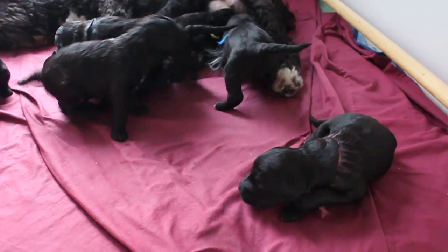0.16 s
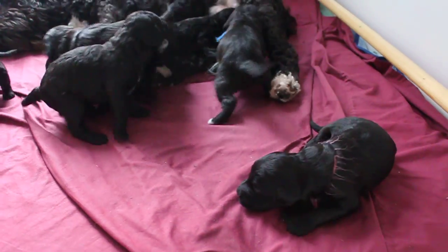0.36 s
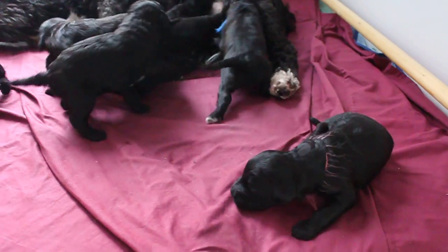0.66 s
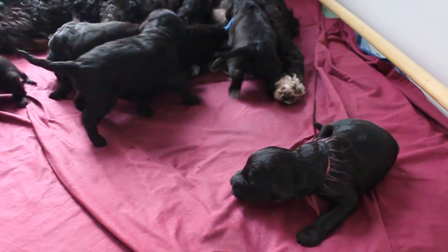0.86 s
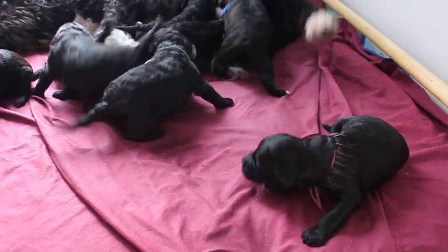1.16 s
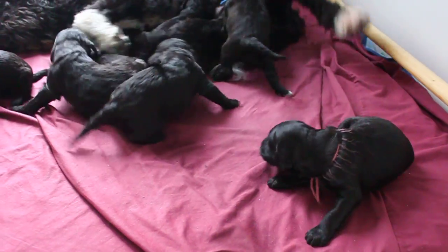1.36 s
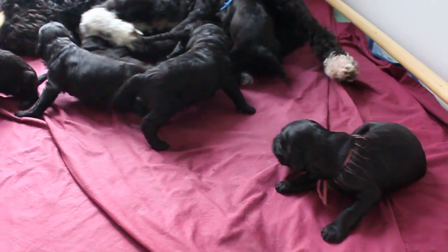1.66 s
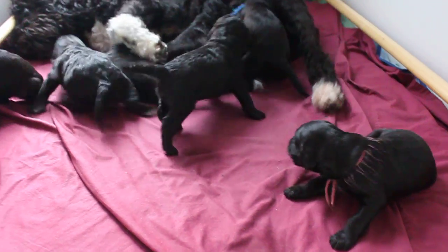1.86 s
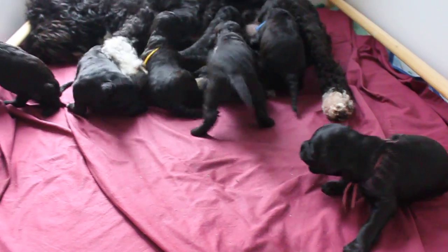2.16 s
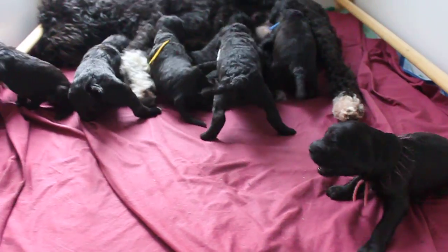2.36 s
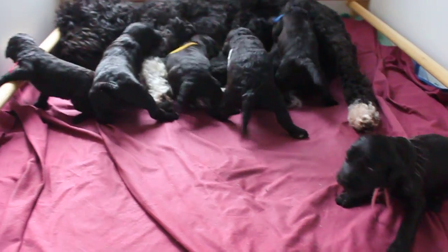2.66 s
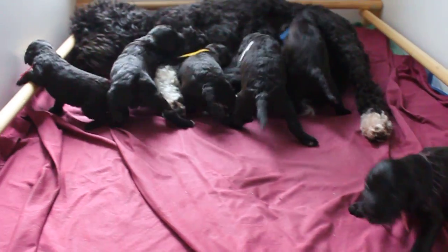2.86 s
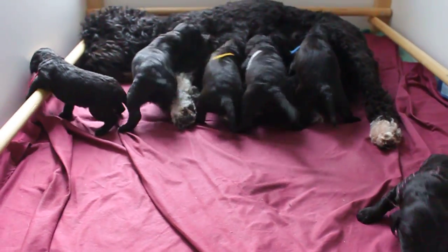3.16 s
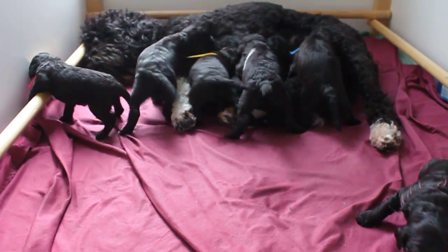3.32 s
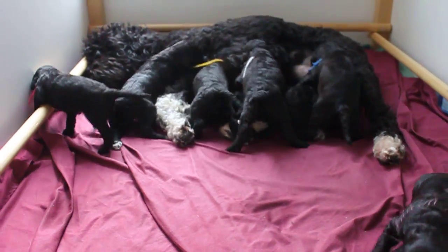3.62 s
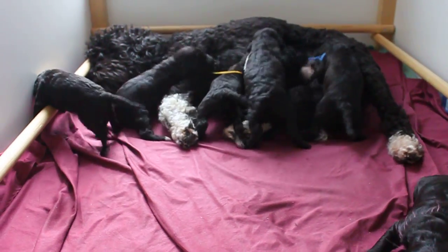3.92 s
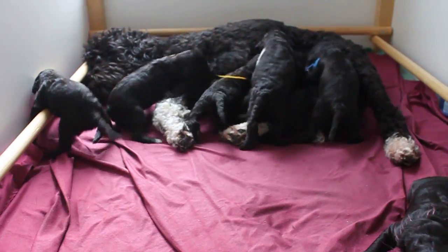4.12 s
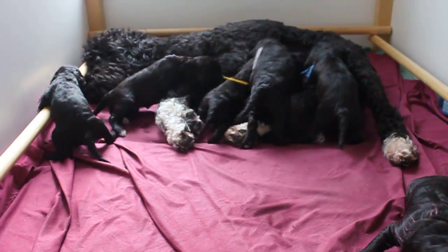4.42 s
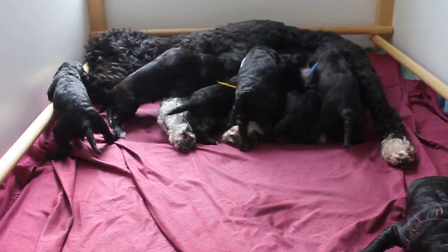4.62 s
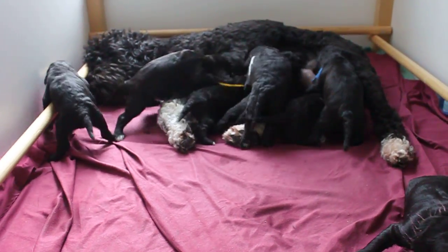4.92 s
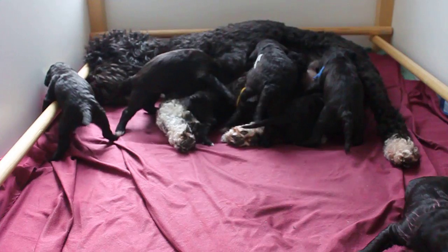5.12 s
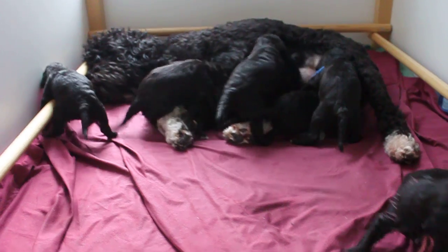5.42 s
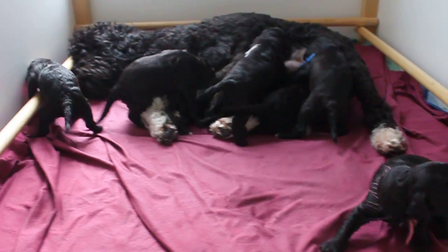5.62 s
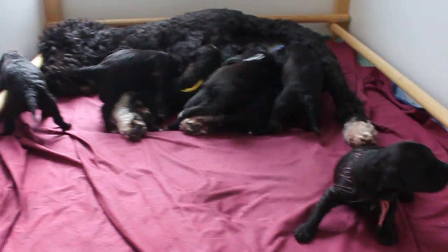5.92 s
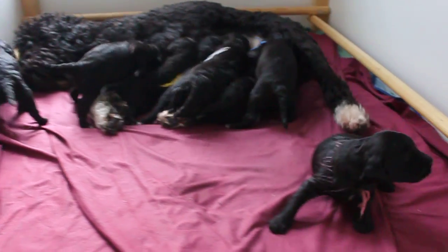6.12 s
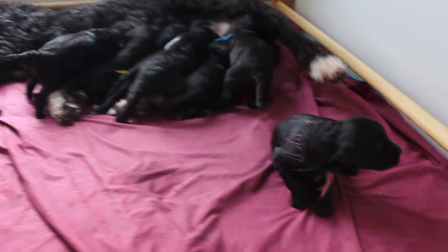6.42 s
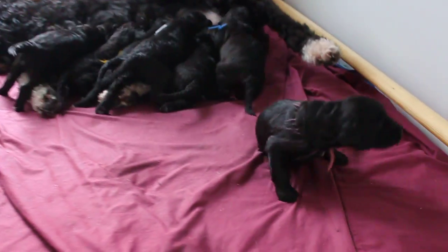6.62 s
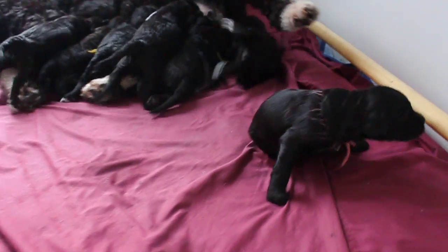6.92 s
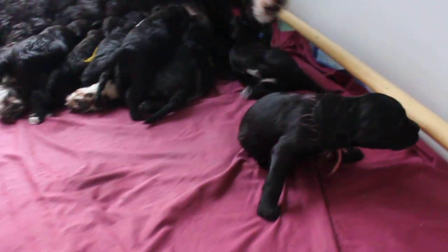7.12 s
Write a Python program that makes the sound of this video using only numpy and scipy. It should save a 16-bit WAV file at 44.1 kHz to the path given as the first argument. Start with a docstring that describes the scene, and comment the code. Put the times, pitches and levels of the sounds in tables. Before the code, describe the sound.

Young puppies are heard from close by, indoors, in a box whose walls add a short ring. Soft rustling and dragging on a cloth sheet runs throughout, with occasional dull paw thuds and small mouth clicks. Muffled whimpers and snuffles come first. From about 0.7 seconds, a near pup gives short, thin whines that climb in pitch, with faint, very high nose whistles. Three loud, clear squeals, each rising and falling, follow at about 1.9, 2.3 and 2.8 seconds. Between 3 and 4.9 seconds the crying pauses, leaving shuffling, clicks, light puffs of air and a few small raspy grunts. Two more loud squeals come at about 5 and 5.5 seconds, then weaker whines around 6 and 6.4 seconds and a muffled whimper and grunt near 6.7. It ends with a longer drag over the cloth and a sharper click at about 7.1 seconds.

```python
"""Puppies nursing in a whelping box

Indoors, one microphone close to the litter. The nearest pups squeal in arched, nearly pure cries from
their vocal folds and whistle through their noses; farther off, others whimper, grunt and snuffle.
Paws thud and drag on the sheet, mouths click at the teats, and the box walls give a short ring.
The recorder's gain control ducks under the loudest cries and slowly climbs back."""
import sys
import numpy as np
from scipy import signal
from scipy.fft import rfft, irfft, next_fast_len
from scipy.io import wavfile
from scipy.ndimage import uniform_filter1d, map_coordinates

SR = 44100
rng = np.random.default_rng(int(sys.argv[2]) if len(sys.argv) > 2 else 0)


def put_to_file(sound):
    """Save the sound as 16-bit audio at rate SR, in the file named by the first command-line argument."""
    columns = np.atleast_2d(sound).T  # one column per channel
    safe = np.clip(columns, -1, 1)
    whole_steps = np.round(safe * 32767)
    wavfile.write(sys.argv[1], SR, whole_steps.astype(np.int16))


N = 321048

# ring of the box walls: f/Hz, t60/s
BOX_DECAY = [(200, 0.088), (1700, 0.222), (5000, 0.1914), (12000, 0.0824)]
# the restless litter on the sheet: t/s, shuffle/dB, rustle/dB
BUSTLE = [(0, -53.5, -30), (0.139, -49.5, -49), (.28, -47, -39.5), (.67, -52, -48), (1.1, -46.5, -45),
          (1.76, -55.5, -46), (2.001, -52, -47.5), (2.45, -60.5, -52.5), (2.75, -51, -53),
          (3.1, -47.5, -38.5), (3.5, -45, -42), (4.0, -55, -50), (4.9, -53, -47), (5.15, -52.5, -47.5),
          (5.6, -54.5, -43), (6.0, -61.5, -44), (6.249, -53.5, -44), (6.6, -49, -39), (7.28, -47.5, -47.5)]
# drags of a paw or belly, the first row instead a bright burst that goes with a pup's yelp: middle t/s,
# length/s, shuffle/dB, rustle/dB, fibre hiss/dB
DRAGS = [(0.871, 0.082, -59, -38, -33.5), (0.938, 0.19, -60.5, -39, -42.5),
         (1.039, 0.089, -36.5, -36.5, -44.5), (1.17, 0.066, -62, -62, -43.5),
         (1.37, 0.13, -69.5, -41.5, -40), (1.452, 0.063, -54.5, -42.5, -40.5),
         (2.6, 0.1215, -41, -38.5, -58.5), (2.698, 0.037, -66, -59.5, -40), (3.004, 0.086, -51, -36, -59.5),
         (3.419, 0.1585, -61.5, -34.5, -37), (3.741, 0.12, -44, -40, -43), (4.191, 0.041, -47, -45.5, -51),
         (4.522, 0.192, -54, -41.5, -52), (5.803, 0.075, -44.5, -37, -34.5),
         (6.481, 0.09, -59, -53.5, -34.5), (6.914, 0.34, -46, -35.5, -34)]
# spectra of the low shuffle and of the rubbed cloth: f/Hz, gain/dB
SHUFFLE_COLOUR = [(35, -42), (60, -35), (80, -2), (118, -14), (151, 0), (231, -6), (400, -9), (520, -13.5),
                  (880, -120)]
CLOTH_COLOUR = [(150, -41), (250, -4), (616, 4), (1060, 2.5), (1470, 2.5), (1870, 1), (4080, -8),
                (13800, -19.5), (15800, -20.5)]
# paws landing: t/s, level/dB, f/Hz
THUDS = [(0.159, -35.5, 285), (0.263, -29, 164.8), (0.379, -31.5, 369.2), (1.039, -27, 131.3),
         (1.298, -36.5, 169.4), (1.693, -26, 157.8), (2.57, -28.5, 244), (3.713, -26, 208.2),
         (7.077, -30.5, 103.2)]
# lips and claws: t/s, relative level/dB
CLICKS = [(0.3792, -25), (0.4113, -26.5), (.615, -38), (1.036, -24), (1.0842, -32.5), (1.4458, -26),
          (1.696, -26), (2.574, -26), (2.588, -22), (2.611, -20), (2.64, -25), (2.6576, -25), (3.5, -27),
          (3.569, -19), (3.591, -23), (3.965, -25), (4.314, -27), (4.8412, -33), (5.295, -24.5),
          (5.328, -29.5), (5.341, -25), (6.4745, -25), (6.4874, -24), (7.0775, -12.5)]
# modes of a click: f/Hz, width/Hz, gain/dB
CLICK_MODES = [(1896, 900, 0.5), (4020, 2100, 0.5), (7500, 5300, -2.5), (11900, 10000, -3.5)]
# puffs through nose and mouth: t/s, length/s, mouth f/Hz, low level/dB, treble level/dB
SNUFFLES = [(0, 0.035, 1050, -28.5, -49), (.158, 0.086, 1100, -38, -48.5), (1.836, .025, 2200, -27, -46),
            (3.146, .04, 2200, -43.5, -55), (3.248, 0.082, 1280, -34.5, -54), (4.95, 0.19, 2500, -37, -45),
            (5.41, 0.079, 2280, -29, -37), (6.655, .12, 1050, -32, -40)]
# hoarse whimpers and raspy grunts of the farther pups:
# t/s, swell/s, fade/s, first f/Hz, last f/Hz, fundamental/dB, overtones before colour/dB, mouth f/Hz
WHIMPERS = [(.025, 0.025, 0.048, 473.5, 461.3, -37.5, -35.5, 1877),
            (.23, 0.036, 0.016, 526.3, 604.6, -33.5, -25.5, 1756),
            (.465, 0.0062, 0.061, 1150, 1218, -29, -36, 2275),
            (.488, 0.037, .045, 560.1, 721.4, -38.5, -29, 1740),
            (1.02, 0.018, 0.015, 852.5, 866.7, -25.5, -34.5, 1720),
            (1.345, 0.039, .025, 1132, 1462, -25.5, -34, 2530),
            (1.778, 0.0444, .042, 359.7, 390, -35, -35.5, 1100),
            (2.256, 0.0095, 0.022, 1843, 1727, -15, -31.5, 3490),
            (4.938, 0.0085, 0.016, 1693, 1684, -28.5, -54.5, 3390),
            (5.407, 0.011, 0.021, 1814, 1807, -12, -45, 3500),
            (6.15, 0.1015, 0.0783, 259.7, 288.1, -48.5, -46, 585),
            (6.555, 0.045, .035, 717.7, 854.4, -41.5, -63, 1600),
            (6.636, 0.045, .06, 1187, 1115, -26.5, -28, 2380)]
GRUNTS = [(.852, 0.0127, 0.0292, 716.4, 805.1, -33, -25, 1587),
          (1.263, 0.00194, 0.0223, 756.5, 731, -32.5, -39, 1459),
          (1.668, 0.0286, 0.0203, 1159, 823, -34, -45.5, 1864),
          (3.165, 0.0224, 0.0272, 504.1, 573, -32, -24.5, 1654),
          (3.4, .032, .045, 1219, 874, -25, -29, 2010), (4.732, .006, .04, 890, 830, -39, -40, 1740),
          (6.708, 0.0186, 0.0383, 497.2, 448.6, -35.5, -24.5, 994)]
# overtone colour of a mouth half shut on a teat, and of a squealing throat: f/Hz, gain/dB
MUFFLED_COLOUR = [(600, 8), (1100, -6.5), (1700, -1), (2400, -16), (3400, -28), (5300, -19.5), (8000, -24),
                  (15000, -35)]
THROAT_COLOUR = [(1600, 14.5), (2500, -0.5), (3600, -11), (4300, -17), (5300, -0.5), (7000, -12),
                 (9500, -17), (12000, -33), (15000, -35)]
MUFFLED_HZ, THROAT_HZ = 1700, 5147  # mouth resonance of each colour
# air through a nose: t/s, length/s, f/Hz, level/dB
WHISTLES = [(1.394, 0.049, 15450, -39), (1.642, 0.039, 14900, -37.5), (5.953, 0.145, 13700, -42.5),
            (5.976, 0.17, 15400, -49), (6.14, 0.027, 14900, -33.5)]
# cries nearest the microphone, a list each: t/s, f/Hz, fundamental/dB, overtones before colour/dB
SQUEALS = [
    [(0.735, 1177, -32, -52), (0.76, 1181, -26.5, -39.5), (0.8, 1300, -25, -36.5),
     (0.83, 1267, -24.5, -42.5), (0.86, 1296, -48, -49.5)],
    [(.824, 903, -23, -39), (.86, 1019, -18, -42.5), (.885, 1134, -22.5, -47), (.93, 1010, -33, -63)],
    [(0.99, 1193, -33, -50.5), (1.04, 1266, -36, -42), (1.09, 1420, -20.5, -41), (1.125, 1407, -27.5, -49),
     (1.17, 1255, -44, -48.5)],
    [(1.32, 1489, -26, -53.5), (1.34, 1742, -23.5, -54.5), (1.365, 1630, -55.5, -66.5)],
    [(1.472, 1548, -18, -52), (1.495, 1738, -19.5, -38.5), (1.55, 1842, -12, -46), (1.57, 1992, -22, -52.5),
     (1.62, 1853, -19.5, -39.5), (1.645, 1582, -29.5, -55), (1.665, 1416, -40, -53)],
    [(1.595, 1345, -35, -54), (1.65, 1395, -28, -48), (1.7, 1420, -48, -50)],
    [(1.835, 1781, -13.5, -55), (1.87, 1826, -4, -25.5), (1.878, 1736, -5.5, -21), (1.89, 1739, 0, -18),
     (1.915, 1806, 5.5, -23), (1.932, 1874, -3.5, -15), (1.942, 2060, 3, -29.5), (1.99, 2082, -7.5, -34.5),
     (2.03, 2098, -11, -47.5), (2.055, 1698, -23, -43.5), (2.085, 1492, -35.5, -76)],
    [(2.262, 1623, -28, -30), (2.285, 1646, -8, -15.5), (2.32, 1765, -1.5, -10), (2.36, 1848, -1.5, -28.5),
     (2.39, 1878, -9, -35), (2.46, 1651, -23.5, -40.5), (2.51, 1459, -23, -35), (2.538, 916, -40.5, -41.5)],
    [(2.717, 1373, -24, -27.5), (2.75, 1495, -7.5, -11.5), (2.78, 1665, 3.5, -7), (2.814, 1751, -5, -18),
     (2.822, 2048, -7.5, -28), (2.832, 1762, -2.5, -31.5), (2.85, 1770, -6.5, -24),
     (2.88, 1391, -16.5, -29), (2.93, 1150, -34.5, -31.5), (2.96, 990, -27.5, -51.5)],
    [(4.945, 1279, -39, -51), (4.96, 1383, -23.5, -34.5), (4.995, 1636, -20.5, -29.5),
     (5.015, 1711, -1.5, -20.5), (5.04, 1726, 8, -22.5), (5.048, 1822, -4.5, -26.5),
     (5.056, 2007, 1.5, -32.5), (5.09, 1803, -14.5, -46.5), (5.17, 1924, -16.5, -51),
     (5.22, 1662, -28, -48), (5.26, 1551, -34, -63.5)],
    [(5.42, 1530, -20, -28), (5.435, 1544, -26, -15), (5.462, 1729, 2.5, -7.5), (5.51, 1735, 0, -20),
     (5.525, 1806, -10, -36), (5.6, 1829, -21, -26), (5.67, 1708, -6, -41.5), (5.695, 1412, -20, -31),
     (5.725, 1111, -50, -35)],
    [(5.898, 1253, -35, -48.5), (5.94, 1392, -17.5, -35), (5.975, 1552, -16.5, -38.5),
     (6.02, 1557, -14.5, -39.5), (6.07, 1344, -26.5, -29), (6.12, 1287, -22, -29), (6.135, 1106, -24, -31),
     (6.17, 1110, -47, -50)],
    [(6.338, 1156, -27.5, -48), (6.38, 1254, -24.5, -47), (6.42, 1236, -16.5, -37.5),
     (6.45, 1042, -19, -44), (6.49, 1138, -57.5, -58)],
]
# each squeal's mouth as the jaw moves: first f/Hz, last f/Hz, tilt/dB per partial, jitter/share of pitch
SQUEAL_MOUTHS = [(5200, 5170, -0.73, 0.0049), (5260, 7500, 1.3, .008), (5520, 4955, -1.4, 0.0042),
                 (3997, 6700, 0, 0.0029), (5567, 5100, 1.3, 0.0061), (5400, 5650, 2.5, .006),
                 (5480, 4750, 0.1, 0.0047), (5070, 5286, -0.82, 0.0016), (4125, 5050, 0, 0.0034),
                 (5110, 5750, 0.38, 0.0047), (5550, 2687, -1.1, .003), (6340, 3540, -1.8, 0.0037),
                 (5990, 5760, 1.69, 0.0038)]
# a second, slower flap of the folds in one cry: t/s, length/s, f/Hz, level against the cry/dB
FOLD_FLAP = (5.478, .1, 563, -22)


def amp(db):
    """dB to gain."""
    return 10 ** (np.asarray(db) / 20)


def unit(x):
    """Scaled to rms 1."""
    return x / np.sqrt(np.mean(x ** 2) + 1e-20)


def along(points, hz):
    """Interpolate (f/Hz, value) points on a log frequency axis."""
    f, values = np.transpose(points)
    return np.interp(np.log(hz + 1), np.log(f + 1), values)


def wobble(rate, size=N):
    """A smooth random curve, rate knots a second."""
    knots = rng.standard_normal(int(size * rate / SR) + 4)
    return map_coordinates(knots, [np.arange(size) * rate / SR])


def filtered(x, response):
    """Shape x by a frequency response."""
    size = next_fast_len(N + 8192)
    return irfft(rfft(x, size) * response(np.fft.rfftfreq(size, 1 / SR)), size)[..., :N]


def resonance(f, hz, width_hz):
    """Response of one damped mode; squared, it is steeper."""
    return 1j * f * width_hz / (hz * hz - f * f + 1j * f * width_hz)


def patchy_noise(depth_db):
    """White noise with patches of random gain in time and frequency."""
    spectrum = signal.stft(rng.standard_normal(N + 512), nperseg=256)[2]
    patches = uniform_filter1d(rng.standard_normal(spectrum.shape), 5, axis=0)
    patches = uniform_filter1d(patches, 8, axis=1)
    return signal.istft(spectrum * amp(depth_db * unit(patches)), nperseg=256)[1][:N]


def box_walls(x):
    """Close walls return a dense tail in which each frequency dies at its own speed."""
    hz, t, spectrum = signal.stft(rng.standard_normal(SR // 2), SR, nperseg=256)
    decay = amp(-60 * t / along(BOX_DECAY, hz)[:, None])
    tail = signal.istft(spectrum * decay, SR, nperseg=256)[1]
    return signal.fftconvolve(np.pad(x, (200, 0)), tail / np.linalg.norm(tail))[:N]


def crawling():
    """Bodies rub the sheet: low shuffle, grainy rustle, fibre hiss; single drags swell above the rest."""
    t = np.arange(N) / SR
    times, *columns = np.transpose(BUSTLE)
    shuffle_db, rustle_db = [np.interp(t, times, column) for column in columns]
    hiss_db = -47 + 0.13 * (rustle_db - rustle_db.mean())
    levels = amp([shuffle_db, rustle_db, hiss_db])
    for middle, length, *drag_db in DRAGS:
        at = slice(round((middle - length / 2) * SR), round((middle + length / 2) * SR))
        swell = 1 - (2 * (t[at] - middle) / length) ** 2
        levels[:, at] = np.hypot(levels[:, at], amp(drag_db)[:, None] * swell)
    lumps = amp(3.6 * wobble(25))
    shuffle = lumps * filtered(rng.standard_normal(N), lambda f: amp(along(SHUFFLE_COLOUR, f)))
    fibres = patchy_noise(depth_db=2.5) * amp(0.97 * wobble(30) + 1.305 * wobble(400))
    cloth = filtered(fibres, lambda f: amp(along(CLOTH_COLOUR, f)))
    rustle = filtered(cloth, lambda f: 1 / (1 + (f / 4500) ** 4))
    hiss = amp(2.2 * wobble(20)) * (cloth - rustle)  # in short strokes
    return np.sum(levels * [unit(shuffle), unit(rustle), unit(hiss)], axis=0)


def paw_thuds(rise_s=0.00602, t60_s=0.0399):
    """A landing paw sets the padded floor into a low, damped swing."""
    out, t = np.zeros(N + SR), np.arange(SR // 5) / SR
    for start, db, hz in THUDS:
        envelope = amp(db + 11.5 - 60 * t / t60_s) * (1 - np.exp(-t / rise_s))
        out[round(start * SR):][:len(t)] += envelope * np.sin(2 * np.pi * hz * t)
    return out[:N]


def clicks():
    """Lips and claws snap: a sharp pulse and a burst of noise excite broad, bright modes."""
    out, t = np.zeros(N + SR), np.arange(SR // 5) / SR
    pulse = 2 * np.exp(-t / .0001)
    for start, db in CLICKS:
        burst = .5 * amp(-60 * t / .008) * rng.standard_normal(len(t))
        out[round(start * SR):][:len(t)] += amp(db + 5) * (pulse + burst)
    return filtered(out[:N], lambda f: sum((-1) ** k * amp(db) * resonance(f, hz, width)
                                           for k, (hz, width, db) in enumerate(CLICK_MODES)))


def snuffles():
    """Lumpy puffs of air with a quick start pass two low mouth resonances and a high nasal one."""
    out = np.zeros(N)
    for start, length, hz, low_db, treble_db in SNUFFLES:
        progress = np.clip((np.arange(N) / SR - start) / length, 0, 1)
        air = unit(amp(2.5 * wobble(250)) * rng.standard_normal(N))
        mouth = filtered(air, lambda f: resonance(f, hz, hz) ** 2
                         - .5 * resonance(f, 2 * hz + 400, 1200) ** 2)
        nose = filtered(air, lambda f: resonance(f, 7200, 4200) ** 2)
        out += np.sin(np.pi * progress ** .45) * (amp(low_db) * unit(mouth) + amp(treble_db) * unit(nose))
    return out


def vocal_folds(calls, mouths, colour, colour_hz, rasp_db, breath_db, flicker_db):
    """Unevenly beating folds make twelve partials on an unsteady pitch, with air hissing out."""
    tone, air = np.zeros((2, N + SR))
    k = np.arange(1, 13)[:, None]
    for call, (*mouth_hz, tilt_db, jitter) in zip(calls, mouths):
        times, *columns = np.transpose(call)
        start, end = times[0], times[-1]
        t = np.arange(start, end, 1 / SR)
        hz, fundamental_db, overtone_db = [np.interp(t, times, column) for column in columns]
        hz = uniform_filter1d(hz, size=180, mode="nearest")
        phase = 2 * np.pi * np.cumsum(hz * (1 + jitter * wobble(153.28, len(t)))) / SR
        mouth_shift = np.linspace(*mouth_hz, len(t)) / colour_hz
        colour_db = along(colour, k[1:] * hz / mouth_shift) + tilt_db * np.maximum(k[1:] - 3, 0)
        level_db = np.vstack([fundamental_db, overtone_db + colour_db])
        # each partial flickers on its own; the faster rasp shakes them all together
        level_db += np.where(k > 1, flicker_db, 1.5) * np.array([wobble(70, len(t)) for _ in k])
        level_db += rasp_db * np.where(k > 1, 1.4, 1) * wobble(294.53, len(t))
        partials = amp(level_db) * np.sin(k * phase) * (k * hz < SR / 2.2)
        edge = np.clip(np.minimum(t - start, end - t) / 0.0017, 0, 1)
        at = slice(round(start * SR), round(start * SR) + len(t))
        tone[at] += edge * np.sqrt(2) * partials.sum(axis=0)
        gasp_db = 10 * np.exp((start - t) / 0.031)  # extra air as the cry breaks loose
        air_db = np.max(level_db[1:3], axis=0) + breath_db + gasp_db
        air[at] += edge * amp(air_db) * (1 + np.sin(phase))
    # two broad mouth resonances colour the breath
    breath = filtered(air[:N] * rng.standard_normal(N),
                      lambda f: resonance(f, 1300, 2200) ** 2 + amp(-15) * resonance(f, 5900, 6600) ** 2)
    return tone[:N] + breath


def muffled_calls(rows, tilt_db, jitter, rasp_db, breath_db, ends_db=-9.5, arch=1.03):
    """Short calls through a still, half-shut mouth swell and fade, the pitch lifted at the top."""
    calls, mouths = [], []
    for start, swell, fade, first_hz, last_hz, db, overtone_db, mouth_hz in rows:
        top_hz = arch * (first_hz * fade + last_hz * swell) / (swell + fade)
        calls.append([(start, first_hz, db + ends_db, overtone_db + ends_db),
                      (start + swell, top_hz, db, overtone_db),
                      (start + swell + fade, last_hz, db + ends_db, overtone_db + ends_db)])
        mouths.append((mouth_hz, mouth_hz, tilt_db, jitter))
    return vocal_folds(calls, mouths, MUFFLED_COLOUR, MUFFLED_HZ, rasp_db, breath_db, flicker_db=3)


def nose_whistles():
    """Air through a nose near the microphone: thin, wavering tones that climb a little."""
    out = np.zeros(N + SR)
    for start, length, hz, db in WHISTLES:
        t = np.arange(0, length, 1 / SR)
        pitch = hz * (1 + 0.11 * t + .006 * wobble(200, len(t)))
        envelope = amp(db) * np.sin(np.pi * t / length) ** .5
        out[round(start * SR):][:len(t)] += envelope * np.sin(2 * np.pi * np.cumsum(pitch) / SR)
    return out[:N]


def squeals():
    """Clear, close cries; in one, a slower flap of the folds adds a line above every partial."""
    cries = vocal_folds(SQUEALS, SQUEAL_MOUTHS, THROAT_COLOUR, THROAT_HZ,
                        rasp_db=1.1, breath_db=-18, flicker_db=4.5)
    start, length, hz, db = FOLD_FLAP
    t = np.arange(N) / SR
    envelope = amp(db) * np.sin(np.pi * np.clip((t - start) / length, 0, 1)) ** .5
    sidebands = np.real(signal.hilbert(cries) * np.exp(2j * np.pi * hz * t))
    return cries + envelope * sidebands


def scene():
    """At the microphone: voices, paws and lips ring in the box over the rustle of the sheet."""
    near = squeals() + nose_whistles()
    far = muffled_calls(WHIMPERS, tilt_db=-2, jitter=.022, rasp_db=1.8, breath_db=-4)
    far += muffled_calls(GRUNTS, tilt_db=-1, jitter=.05, rasp_db=2.2, breath_db=0)
    far += snuffles()
    contacts = paw_thuds() + clicks()
    walls = box_walls(amp(-7) * near + amp(-9.5) * far + amp(-5.5) * contacts)
    return (walls + crawling() + contacts + far + near)[None]


def record(dry, limit_db=-13.5, listen_s=0.0169, attack_s=.008, recover_db_per_s=7):
    """The recorder: gain ducks fast and climbs slowly; faint hiss, soft ceiling, bass and top cut."""
    power = np.abs(uniform_filter1d(dry ** 2, round(listen_s * SR)))
    duck_db = np.minimum(limit_db - 10 * np.log10(power + 1e-12), 0)
    climb_db = recover_db_per_s * np.arange(N) / SR
    gain_db = climb_db + np.minimum.accumulate(duck_db - climb_db, axis=1)
    ducked = dry * amp(uniform_filter1d(gain_db, round(attack_s * SR)))
    noisy = ducked + amp(-73) * rng.standard_normal(N)
    ceiling = np.where(noisy > 0, .4, .35)  # lopsided
    clipped = noisy / (1 + np.abs(noisy / ceiling) ** 8) ** (1 / 8)
    return filtered(clipped, lambda f: (f < 15850) / np.sqrt(1 + (65 / (f + 1)) ** 4))


dry = scene()
out = record(dry)
put_to_file(out)
```